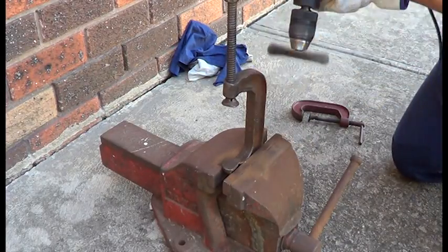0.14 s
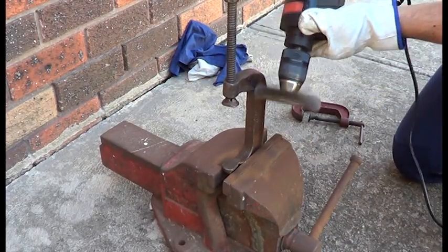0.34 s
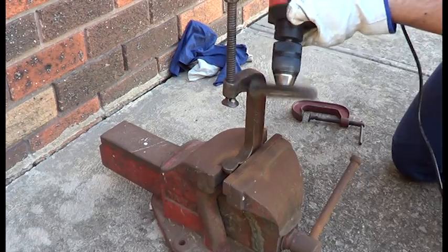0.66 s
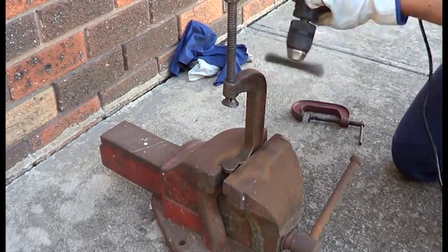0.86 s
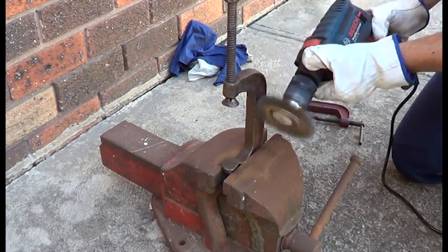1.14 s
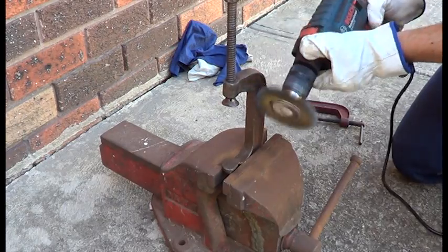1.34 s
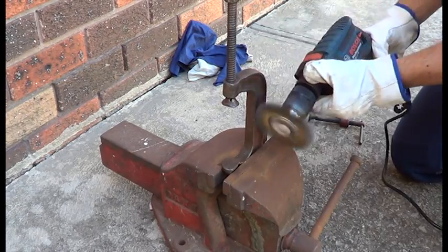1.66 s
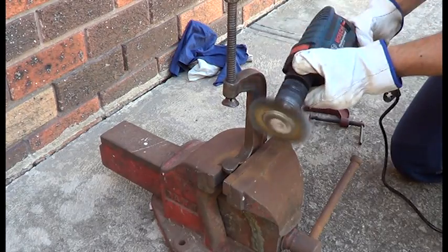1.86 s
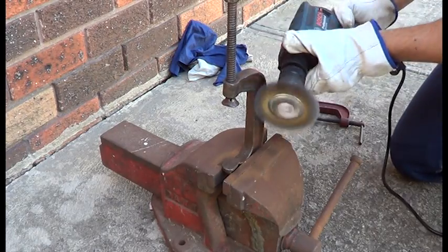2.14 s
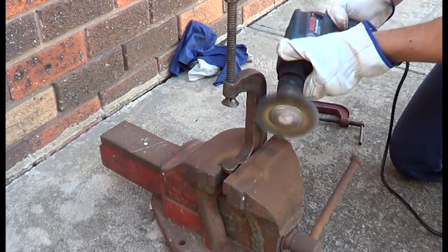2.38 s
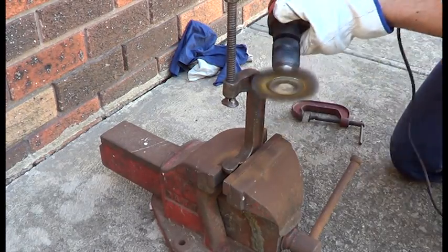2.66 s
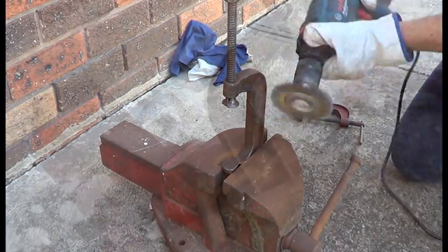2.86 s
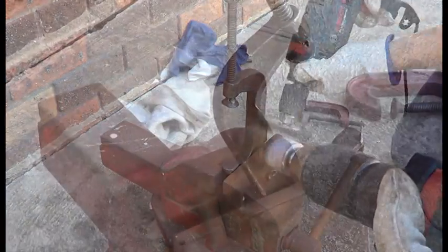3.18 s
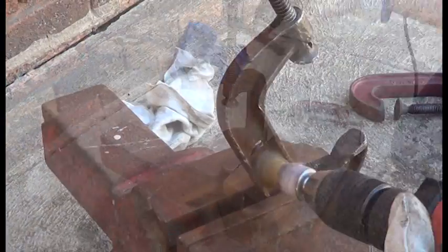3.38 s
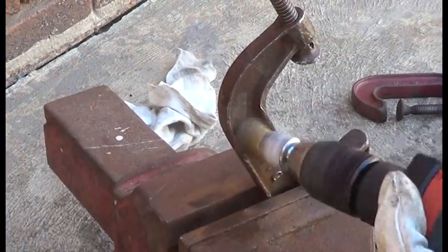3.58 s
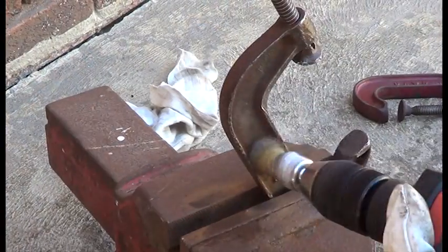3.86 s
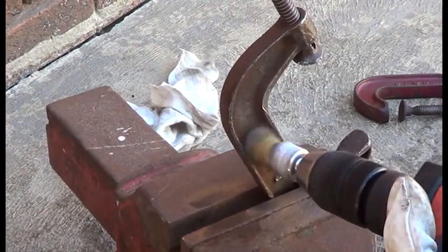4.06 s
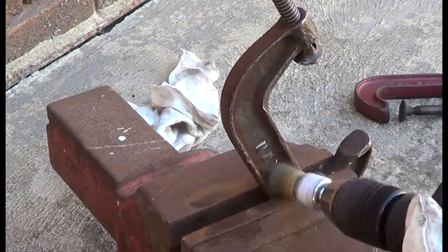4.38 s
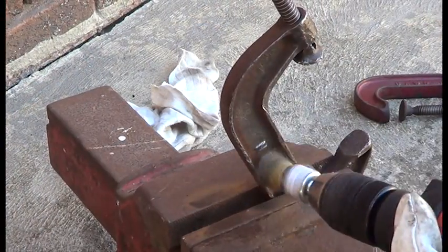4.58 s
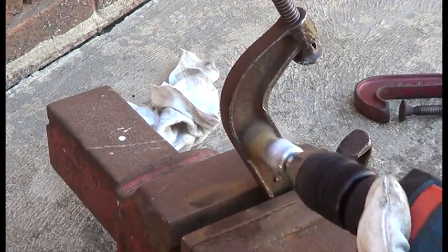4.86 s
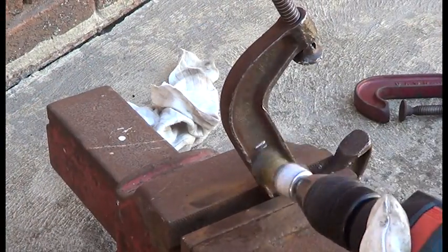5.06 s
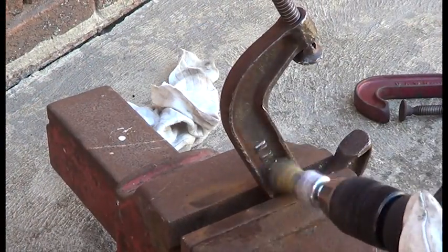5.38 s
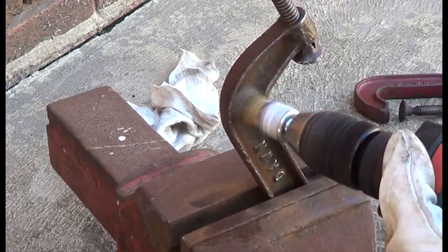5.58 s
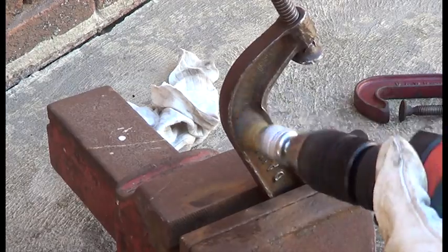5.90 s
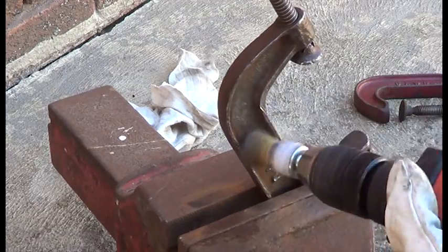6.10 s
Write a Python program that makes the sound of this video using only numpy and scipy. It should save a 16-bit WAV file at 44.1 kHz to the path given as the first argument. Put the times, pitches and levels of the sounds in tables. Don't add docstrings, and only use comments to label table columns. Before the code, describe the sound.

A drill spins free with a high whine, then bogs down as its wire brush bites rusty metal. Several uneven strokes follow, each scraping densely and sometimes ringing the clamp, with quick rises in pitch between them. Then a closer cup brush rubs continuously, its whine gliding gently and finally stuttering. Gusts thump in clusters on an exposed outdoor microphone.

```python
import sys
import numpy as np
from scipy import signal
from scipy.io import wavfile
from scipy.ndimage import uniform_filter1d

SR = 44100
rng = np.random.default_rng(int(sys.argv[2]) if len(sys.argv) > 2 else 0)


def makeup_ratio(level_db):
    decades = np.asarray(level_db, float) / 20
    return 10 ** decades


def generate_wav(signal):
    frames = np.transpose(np.atleast_2d(signal))
    scaled = np.clip(frames, -1, 1) * 32767
    pcm = np.round(scaled).astype(np.int16)
    wavfile.write(sys.argv[1], SR, pcm)


N = 275184
CHANGE_S = 3.2115
ROTOR_SHARE, SPINDLE_SHARE = .1167, 1 / 88
BITE_DB_PER_S = 258
# start in seconds, length in seconds, level in dB, added ring of the clamp in dB.
BITES = [
    (0.16, 0.018, -36, -4),
    (0.909, 0.091, -40, -13),
    (1.03, 0.335, -60, 3),
    (1.47, 0.063, -43, 5),
    (2.867, 0.064, -42, -8),
    (1.6, .6, -55, 0),
    (3.121, 0.055, -41, 4),
    (3.226, 0.054, -45, -9),
]


def in_time(rows):
    s, *columns = np.transpose(rows)
    return [np.interp(np.arange(N) / SR, s, c) for c in columns]


def at_hz(points, hz):
    point_hz, point_db = np.array(points)[:, :2].T
    return np.interp(np.log(hz), np.log(point_hz), point_db)


def rms_one(x):
    return x / np.sqrt(np.mean(x ** 2) + 1e-20)


def drift(rate):
    r = np.exp(-80 * np.pi * rate / SR)
    slow = signal.lfilter([1], [1, -2 * r, r * r], rng.standard_normal(N // 40 + 2002))
    slow = rms_one(slow[2000:])
    return np.interp(np.arange(N) / 40, np.arange(len(slow)), slow)


def bands(low_hz, high_hz, count):
    edges = np.geomspace(low_hz, high_hz, count + 1)
    return [(np.sqrt(a * b), signal.butter(2, [a, b], "band", fs=SR, output="sos"))
            for a, b in zip(edges, edges[1:])]


def resonance(x, hz, width):
    r = np.exp(-np.pi * width / SR)
    zeros = np.array([1, 0, -1]) * (1 - r * r) / 2
    return signal.lfilter(zeros, [1, -2 * r * np.cos(2 * np.pi * hz / SR), r * r], x)


def grains(spread_db, channels):
    size = np.minimum(rng.exponential(1, (channels, N)), 4)
    return rms_one(rng.standard_normal((channels, N)) * makeup_ratio(spread_db * size))


def spell(s, length, db, rise, fall):
    t = np.arange(0, N, 20) / SR
    before, after = np.maximum(s - t, 0), np.maximum(t - s - length, 0)
    return makeup_ratio(2 * (db - rise * before - fall * after)) + 1e-30


def level_of(power):
    return np.interp(np.arange(N) / 20, np.arange(len(power)), 10 * np.log10(power))


def moves():
    # time in seconds, tooth rate in hertz, 4th harmonic in dB.
    free_spin = [(0.0, 2320, -33.5), (0.055, 2290, -36), (0.112, 2324, -34), (0.125, 2290, -33),
                 (0.15, 2020, -48)]
    first_dip = [(0.285, 1334, -57), (0.3, 1255, -53), (0.316, 1162, -43.5), (0.334, 1115, -45),
                 (0.347, 1158, -49), (0.358, 1312, -48), (0.366, 1382, -52)]
    first_stroke = [
        [(0.372, 1442, -57), (0.38, 1492, -49), (0.398, 1624, -37), (0.408, 1618, -38.5), (0.494, 1765, -45),
         (0.546, 1800, -45), (0.6, 1729, -40.5)],
        [(0.61, 1744, -41.5), (0.692, 1616, -37), (0.768, 1677, -41.5), (0.808, 1682, -37.5),
         (0.846, 1655, -42), (0.872, 1667, -38.5), (0.89, 1600, -40), (.91, 1670, -54)],
    ]
    second_stroke = [(1.066, 1510, -47), (1.086, 1700, -43), (1.1, 1797, -55), (1.116, 1850, -42),
                     (1.166, 1897, -42), (1.26, 1850, -46.5), (1.359, 1668, -45.5), (1.422, 1630, -44.5),
                     (1.459, 1493, -59)]
    first_lift = [(1.621, 1603, -46), (1.645, 2110, -36), (1.664, 2230, -37.5), (1.682, 2320, -35.5),
                  (1.697, 2176, -34), (1.725, 1970, -42.5), (1.76, 1624, -41), (1.776, 1587, -47),
                  (1.796, 1472, -59)]
    bogged = [(1.804, 1390, -48), (1.822, 1360, -44), (1.842, 1385, -54), (1.858, 1362, -46),
              (1.871, 1380, -54), (1.89, 1487, -66), (1.912, 1530, -55)]
    third_stroke = [(1.925, 1558, -50), (1.941, 1589, -44), (1.965, 1590, -49), (2.027, 1675, -41),
                    (2.09, 1712, -40.5), (2.163, 1694, -41.5), (2.185, 1640, -60), (2.231, 1619, -47),
                    (2.254, 1626, -53), (2.275, 1742, -56)]
    fourth_stroke = [
        [(2.285, 1793, -48), (2.301, 1805, -43.5), (2.335, 1843, -42), (2.381, 1910, -39), (2.485, 1889, -39.5),
         (2.515, 1865, -42.5), (2.567, 1863, -41.5), (2.575, 1855, -44)],
        [(2.585, 1805, -43), (2.597, 1830, -39), (2.663, 1846, -42), (2.685, 1828, -40.5), (2.757, 1808, -41.5),
         (2.781, 1793, -49), (2.813, 1716, -39.5), (2.835, 1700, -45), (2.85, 1767, -45)],
    ]
    second_lift = [(3.036, 1700, -43), (3.054, 2030, -40), (3.073, 2220, -37.5), (3.087, 2270, -41),
                   (3.108, 2150, -39)]
    cup_up = [
        [(3.218, 1300, -45), (3.298, 1466, -45.5), (3.336, 1600, -47), (3.366, 1648, -40.5), (3.388, 1673, -48),
         (3.45, 1726, -40), (3.5, 1679, -45)],
        [(3.52, 1688, -45.5), (3.572, 1694, -40), (3.694, 1733, -42), (3.812, 1723, -44.5), (3.854, 1700, -40),
         (3.87, 1697, -44)],
        [(3.892, 1714, -43.5), (3.996, 1747, -41), (4.15, 1743, -46.5), (4.2, 1759, -42.5), (4.256, 1782, -44),
         (4.26, 1800, -54)],
    ]
    cup_turn = [(4.275, 1825, -42), (4.292, 1836, -47), (4.308, 1836, -47)]
    cup_down = [
        [(4.32, 1848, -48), (4.326, 1808, -42), (4.36, 1740, -38.5), (4.43, 1675, -39), (4.55, 1577, -42),
         (4.582, 1589, -45.5), (4.8, 1544, -41.5), (4.82, 1545, -43)],
        [(4.83, 1544, -41), (4.89, 1558, -45.5), (4.924, 1593, -45), (4.958, 1616, -41.5), (5.076, 1670, -44),
         (5.098, 1638, -41.5), (5.19, 1657, -43), (5.3, 1677, -39)],
        [(5.378, 1652, -40.5), (5.434, 1640, -39.5), (5.562, 1660, -42), (5.568, 1638, -38.5),
         (5.68, 1663, -37), (5.72, 1654, -39)],
    ]
    cup_down_end = [(5.736, 1673, -40), (5.798, 1726, -36), (5.882, 1746, -36), (5.96, 1743, -38.5),
                    (6.006, 1730, -36.5), (6.125, 1696, -38.5), (6.188, 1742, -37), (6.24, 1686, -37.5)]
    # 1st harmonic re the 4th in dB,
    # 2nd harmonic re the 4th in dB, shift of the weak harmonics in dB.
    others = [(-36, -33, -14), (-30, -30, -8), (-29.5, -27, -1), (-34, -21, 0.), (-44, -40, -6),
              (-40, -35, -10), (-40, -26, 0.), (-27, -26, 0.), (-42, -39, -12), (-23.5, -19, 0.),
              (-28.5, -28, 0.)]
    tables = (free_spin, first_dip, first_stroke, second_stroke, first_lift, bogged, third_stroke,
              fourth_stroke, second_lift, [*cup_up, cup_turn], [*cup_down, cup_down_end])
    fade_s, muted_db = .003, -86
    rates, levels = [], []
    for table, others_db in zip(tables, np.array(others)):
        rows = sorted(map(tuple, np.vstack(table)))
        rates += [(s, hz) for s, hz, db in rows]
        faded = [(rows[0][0] - fade_s, 0, muted_db), *rows, (rows[-1][0] + fade_s, 0, muted_db)]
        levels += [(s, db, *(db + others_db[:2]), others_db[2]) for s, hz, db in faded]
    return in_time(sorted(rates)) + in_time(sorted(levels))


def gears(tooth_hz, teeth, levels_db, near):
    # multiple of the tooth rate, level with the wheel brush in dB, with the cup brush in dB.
    weak = [(1.75, -34, -16.5), (3, -18, -6.5), (5, -24, -15), (12, 6, -20)]
    # frequency in hertz, level in dB.
    casing = [(1900, -29), (3400, -0.5), (4300, -1.5), (4700, -2.5), (5250, 0.5), (9000, 7.5), (10800, 23),
              (12000, 28), (13300, 8), (15000, 6)]
    # start in seconds, length in seconds,
    # 4th order in dB, 2nd, 3rd and 5th order in dB.
    hum = [
        (0, 0.12, -62.5, -76),
        (2.3, 0.55, -76, -108),
        (3.33, 0.38, -91, -77.5),
        (3.76, 0.99, -76, -90),
        (4.75, 0.13, -72, -74),
        (5.4, 0.71, -74, -88),
    ]
    # time in seconds, 6th harmonic in dB, 8th harmonic in dB.
    wheel_overtones = [(0, -47, -70), (.14, -48, -70), (.2, -69, -66), (.295, -49, -45), (.334, -55, -53),
                       (.41, -47, -45), (.52, -49, -55), (.684, -40, -49), (.75, -45, -51),
                       (.888, -42.5, -51), (.9, -68, -68), (1.09, -58, -56), (1.135, -44, -47),
                       (1.25, -46.5, -63), (1.31, -50, -50), (1.43, -50, -52), (1.47, -64, -66),
                       (1.62, -66, -61), (1.65, -52, -64), (1.81, -53, -50), (1.93, -49, -48),
                      (1.97, -62, -55), (2.04, -54, -61), (2.15, -51, -54), (2.19, -62, -49),
                      (2.27, -61, -51), (2.3, -55, -66), (2.79, -50, -66), (2.83, -42, -60),
                      (2.87, -72, -63), (3.07, -43, -66), (3.2, -72, -69)]
    cup_overtones = [(3.22, -48, -37), (3.35, -44, -52), (3.56, -47.5, -48), (3.7, -44.5, -55),
                     (4.16, -42.5, -53), (4.3, -50.5, -58), (4.37, -42.5, -52), (4.53, -46.5, -48),
                     (4.81, -57.5, -45), (4.87, -55, -60), (5.0, -49.5, -54), (6.04, -43.5, -48),
                     (6.24, -48, -51)]
    fourth_db, first_db, second_db, weak_db = levels_db
    sixth_db, eighth_db = in_time(sorted(wheel_overtones + cup_overtones))
    rotor = 2 * np.pi * ROTOR_SHARE * teeth

    hum_db, low_db = (level_of(sum(spell(*row[:2], row[k], rise=400, fall=400) for row in hum))
                      for k in (2, 3))
    out = makeup_ratio(hum_db + 5.2 * drift(13)) * np.sin(4 * rotor)
    out += makeup_ratio(low_db) * sum(makeup_ratio(2 * drift(24)) * np.sin(k * rotor) for k in (2, 3, 5))

    # harmonic, level in dB, depth of the rotor's swing in radians, waver of the hand in dB
    harmonics = [(4, fourth_db, 0.34, 0.75), (6, sixth_db, 0.46, 0.88), (8, eighth_db, 0.51, 0.5),
                 (1, first_db, 0.12, .7), (2, second_db, 0.11, 1.7)]
    mean_db = (fourth_db + sixth_db) / 2 + weak_db
    for k, wheel_db, cup_db in weak:
        level_db = mean_db + np.where(near, cup_db, wheel_db) + at_hz(casing, k * tooth_hz)
        harmonics.append((k, level_db, 0.11 * k, 0.091 * k))
    skip_db = skips(column=1)
    for k, level_db, depth, waver_db in harmonics:
        start = rng.uniform(0, 2 * np.pi, 3)
        swing = depth * (np.sin(rotor + start[0]) + 0.19 * np.sin(2 * rotor + start[1]))
        tone = np.sin(k * teeth * 2 * np.pi + swing + start[2]) * (k * tooth_hz < .45 * SR)
        shake_db = waver_db * drift(2.9) + 1.16 * drift(37)
        out += makeup_ratio(level_db + 3.0 - skip_db + shake_db) * tone
    return out


def pressure(near):
    # time in seconds, scratch level in dB.
    wheel_pressure = [(0, -34), (0.244, -39), (0.357, -36.5), (0.606, -40), (0.861, -39), (1.0, -40),
                      (1.317, -42), (1.43, -41), (1.554, -43.5), (1.639, -40), (1.751, -42.5), (1.806, -43),
                      (2.073, -39), (2.23, -42), (2.352, -41), (2.74, -41.5), (2.958, -39.5), (3.2, -40)]
    cup_pressure = [(3.214, -40.5), (3.49, -40.5), (3.687, -39.5), (3.811, -39.5), (4.27, -39),
                    (4.355, -41), (4.707, -40.5), (4.939, -39.5), (5.049, -42), (5.241, -39.5), (5.5, -42),
                    (5.56, -40), (5.727, -40), (5.904, -41), (5.999, -40), (6.24, -40)]
    steady_db, = in_time(sorted(wheel_pressure + cup_pressure))
    bite_power = sum(spell(*row[:3], BITE_DB_PER_S, BITE_DB_PER_S) for row in BITES)
    level_db = level_of(makeup_ratio(2 * steady_db[::20]) + bite_power)
    mean_db = np.where(near, -39, -45.5)
    dull, top = np.where(near, 0.81, 0.49), np.where(near, 1.5, 0.48)
    dull_db = dull * (mean_db - steady_db) + 0.04 * (level_db - steady_db)
    return level_db, dull_db, top * (mean_db - level_db)


def brush(teeth, near):
    # frequency in hertz, density in dB per hertz.
    wheel_colour = [(24, -66), (40, -38), (193, -23.5), (597, -20), (744, -24), (863, -22), (1410, -22),
                    (1720, -16.5), (4250, -6.5), (4750, -5), (5450, -1.5), (7140, -1.5), (8070, -5.5),
                    (12900, -1), (14200, -7)]
    cup_colour = [(24, -69), (40, -35.5), (657, -23.5), (953, -17.5), (1450, -22), (2700, -9.5), (3720, -9),
                  (4770, -2.5), (5670, -3.5), (8430, 3), (10300, 1), (12500, -2.5), (13800, -2.5),
                  (14900, -7.5)]
    # frequency in hertz, side under mid in dB.
    wheel_side = [(1000, -14), (2500, -13.5), (4500, -10), (7000, -12.5), (9000, -12.5), (12000, -13.5),
                  (14500, -5)]
    cup_side = [(1000, -15), (2500, -14), (4500, -13), (7000, -11.5), (9000, -16.5), (12000, -11),
                (14500, -7)]
    # frequency in hertz, width in hertz,
    # level with the wheel brush in dB, level with the cup brush in dB.
    clamp = [(962.6, 39.2, -38, -36), (1140, 83, -33, -53), (2730, 307, -37, -29), (3450, 140, -37, -40),
             (4700, 98, -15.5, -33), (4940, 59, -35, -27.5), (5210, 340, -9, -19), (5250, 70, -31, -42),
             (5470, 69, -13, -49)]
    level_db, dull_db, top_db = pressure(near)
    pulse = np.sin(2 * np.pi * ROTOR_SHARE * teeth)
    wires = grains(2.7, channels=4).reshape(2, 2, N)
    together = drift(23)
    tips = drift(10.0)
    out = 0
    for k, (hz, sos) in enumerate(bands(43.5, 2684, count=12) + bands(2590, 16300, count=18)):
        mid, side = signal.sosfilt(sos, wires[k % 2])
        place = np.log2(hz / 7000)
        colour_db = np.where(near, at_hz(cup_colour, hz), at_hz(wheel_colour, hz))
        tilt_db = dull_db * np.clip(-place / 0.31, 0, 1) + top_db * np.clip((place - .3) / .5, 0, 1)
        flicker_db = .5 * together + 0.85 * drift(35)
        flicker_db += 1.17 * tips * np.clip(2.0 * place - .3, 0, 1)
        flicker_db += 0.59 * pulse * np.clip(place + 3.9, 0, 2)
        side = side * makeup_ratio(np.where(near, at_hz(cup_side, hz), at_hz(wheel_side, hz)))
        out = out + makeup_ratio(colour_db + tilt_db + flicker_db) * np.array([mid + side, mid - side])
    out = out - near * 0.46 * resonance(out, hz=12550, width=900)

    ringing = 0
    for hz, width, wheel_db, cup_db in clamp:
        mode = rms_one(resonance(rng.standard_normal(N), hz, width))
        ringing = ringing + makeup_ratio(np.where(near, cup_db, wheel_db) + 2.0 * drift(3.0)) * mode
    ring_power = sum(spell(s, length, db, BITE_DB_PER_S, BITE_DB_PER_S) for s, length, _, db in BITES)
    ringing = ringing * makeup_ratio(4.1 * dull_db + level_of(0.74 + ring_power))
    return makeup_ratio(level_db + 1.5 - skips(column=2)) * (rms_one(out) + ringing)


def gusts():
    # start in seconds, length in seconds, level in dB, brightness in dB.
    gust_rows = [(0, 0.1, -55.5, 16), (0.147, 0.21, -53, 10), (0.37, 0.045, -48, 21),
                 (0.426, 0.25, -53, 17.5), (0.71, 0.17, -57, 15), (0.898, 0.047, -44.5, 14),
                 (0.963, 0.03, -48, 20), (1.016, 0.079, -58, 3), (1.051, 0.012, -46.5, 18),
                 (1.088, 0.2, -56, 12.5), (1.32, 0.013, -52.5, 6), (1.425, 0.068, -56.5, 6),
                 (2.551, 0.34, -63, -1), (2.965, 0.014, -49, 8), (3.216, 0.029, -52.5, 4),
                 (3.27, 0.016, -53.5, 1), (3.969, 0.046, -54, 8), (4.04, 0.026, -48.5, 7),
                 (4.082, 0.025, -52, 15), (4.136, 0.036, -48, 11), (4.26, 0.0091, -52, 12),
                 (4.195, 0.021, -50, 10), (4.96, 0.026, -49, 11), (5.044, 0.11, -60.5, 0),
                 (5.223, 0.016, -54.5, 8), (5.289, 0.015, -52, 5), (5.328, 0.058, -63.5, 6),
                 (5.466, 0.046, -72, 14), (5.803, 0.029, -66, 24), (5.979, 0.017, -75, 34),
                 (6.045, 0.12, -58.5, 5), (6.221, 0.009, -52, 5)]
    calm_db = -71
    powers = np.array([spell(s, length, db, rise=607, fall=360) for s, length, db, _ in gust_rows])
    total = powers.sum(axis=0) + makeup_ratio(2 * calm_db)
    edge = (np.array(gust_rows)[:, 3] @ powers) / total
    return level_of(total), level_of(makeup_ratio(2 * edge))


def wind():
    # frequency in hertz, density in dB per hertz.
    wind_colour = [(15, -59), (25, -33), (96, -17), (306, -4), (466, -19), (525, -6.5), (1640, -22),
                   (2560, -54)]
    likeness = [(25, .3), (70, 0.67), (160, 0.98), (330, 0.31), (700, -0.12), (1500, -0.75)]
    gust_db, edge_db = gusts()
    gust_db = gust_db - 25 / (1 + makeup_ratio(1.17 * (gust_db + 66.0)))
    lumps_db = 2.5 * drift(72) + 2.0 * np.array([drift(32), drift(96)])
    lumps_db = np.minimum(lumps_db, 3)
    struck = rng.random((2, N)) < 3500 / SR
    eddies = grains(3, channels=2) * struck + 0.03 * rng.standard_normal((2, N))
    out = 0
    for k, (hz, sos) in enumerate(bands(15.3, 2680, count=11)):
        mid, side = signal.sosfilt(sos, eddies)
        alike = np.clip(at_hz(likeness, hz), -1, 1)
        port = np.sqrt(1 + alike) * mid + np.sqrt(1 - alike) * side * [[1], [-1]]
        bright_db = (.5 * (edge_db - 5.5) + 0.12 * lumps_db) * np.clip(np.log2(hz / 500), -1.3, 2)
        out = out + makeup_ratio(at_hz(wind_colour, hz) + bright_db) * port * (-1) ** k
    return makeup_ratio(gust_db + 1.0) * rms_one(out * makeup_ratio(lumps_db)) + buffets()


def catches():
    # centre in seconds, length in seconds, level in dB.
    catch_rows = [
        (0.093, 0.028, -70),
        (0.777, 0.028, -64),
        (1.989, 0.046, -65.5),
        (2.816, 0.018, -58.5),
    ]
    t, mode_hz = np.arange(N) / SR, 1150
    swell = sum(makeup_ratio(db) * np.exp(-((t - s) / length) ** 2) for s, length, db in catch_rows)
    mode = resonance(rng.standard_normal(N), mode_hz, width=92.3)
    return swell * rms_one(resonance(mode, mode_hz, width=88.7))


def buffets():
    # peak time in seconds, peak in dB, centre in hertz, left-right difference in dB.
    buffet_rows = [(0.381, -40, 1050, 6), (0.391, -34, 1020, -4), (0.404, -49, 700, 2), (0.412, -47, 900, -2.0),
                   (0.42, -50, 820, 7), (0.556, -39, 806, 3), (0.665, -37, 865, -6), (0.902, -49, 707, 6),
                   (0.909, -34.0, 666, -1), (0.915, -29.5, 1200, 0), (0.922, -36, 480, 3), (0.929, -36, 560, 6),
                   (0.937, -30, 648, -2.0), (0.942, -49, 600, 1), (0.962, -40, 600, 3), (0.969, -36, 500, -1),
                   (0.974, -36.5, 1060, -10), (0.981, -31, 730, -1), (0.99, -37, 892, 1), (1.001, -41, 750, 7),
                   (1.05, -30, 764, 3), (1.056, -26.5, 1158, -2), (1.079, -45, 860, -5),
                   (2.967, -34.5, 416.5, -5), (3.216, -35, 589, 3), (3.233, -42, 577, -6.0),
                   (3.242, -40.5, 582, -12), (3.28, -29, 489, -1), (3.29, -41, 430, 0.), (3.99, -45, 700, -4),
                   (4.026, -53, 503.6, -15), (4.04, -36.5, 629, -2), (4.1, -36, 501, -1), (4.109, -30.5, 701, 5),
                   (4.113, -32.5, 810, 1), (4.135, -35, 602, -3), (4.141, -39, 560, 0.), (4.147, -30, 599, -1),
                   (4.158, -44, 767, 0), (4.165, -34, 650, 0.0), (4.176, -36, 506.5, 0),
                   (4.205, -36.5, 728, -6.0), (4.212, -40, 600, -4.0), (4.955, -38, 697, 6),
                   (4.959, -29.5, 660, 8), (4.964, -41, 698, 2), (4.971, -42, 754, -12), (4.98, -36, 672, 3),
                   (5.976, -36, 769.5, -1), (6.227, -33.5, 626, 4),
                   (0.33, -48, 444, 5), (0.508, -41.5, 492, 1), (0.764, -42, 1053, 0), (1.169, -47, 420, 1.0),
             (3.96, -47, 569, -3), (4.259, -44, 326.5, -3), (5.39, -48.5, 420, -1.5),
             (5.455, -44.5, 704, -1), (5.492, -42, 700, 2), (6.072, -47, 497, 2)]
    rows = buffet_rows
    rise_s, fall_s, core_s = 0.0014, 0.0032, 0.00011
    port_lag_s = .00015
    out, t = np.zeros((2, N + 1024)), np.arange(-256, 768) / SR
    shape = np.exp(np.minimum(t / rise_s, -t / fall_s))
    for (s, peak_db, hz, pan_db), noise in zip(rows, rng.standard_normal((len(rows), 2, 1024))):
        core = np.exp(-((t - port_lag_s * noise[:, :1]) / core_s) ** 2)
        puff = 0.76 * shape * noise + 1.5 * core
        puff = resonance(resonance(puff, 0.82 * hz, 0.9 * hz), 0.75 * hz, 1.4 * hz)
        puff = signal.sosfilt(signal.butter(1, 1.3 * hz, fs=SR, output="sos"), puff)
        size = np.abs(puff.mean(axis=0))
        at = max(round(s * SR) - size.argmax(), 0)
        gain = makeup_ratio(peak_db - 4.0 + pan_db / 2 * np.array([[1], [-1]]))
        out[:, at:at + 1024] += gain * puff / size.max()
    return out[:, :N]


def skips(column):
    # centre in seconds, whine loss in dB, scratch loss in dB.
    skip_rows = [
        (5.746, 11, -0.5),
        (5.807, 9, -2.5),
        (5.856, 19, -2.5),
        (5.908, 13, -2),
        (5.96, 15, -0.5),
    ]
    t, length_s = np.arange(N) / SR, 0.011
    return sum(row[column] * np.exp(-((t - row[0]) / length_s) ** 2) for row in skip_rows)


def scene():
    tooth_hz, *levels_db = moves()
    near = np.arange(N) / SR > CHANGE_S
    runout = np.sin(2 * np.pi * SPINDLE_SHARE * np.cumsum(tooth_hz) / SR) * np.where(near, .0012, .003)
    tooth_hz = uniform_filter1d(tooth_hz, size=500) * (1 + runout + 0.001778 * drift(20.7))
    teeth = np.cumsum(tooth_hz) / SR
    whine = gears(tooth_hz, teeth, levels_db, near)
    echo = makeup_ratio(np.where(near, -24, -16)) * np.roll(whine, round(.0031 * SR))
    drill = np.array([whine + echo, whine - echo]) + brush(teeth, near) + catches()
    pan_db = np.where(near, -1.1, 0) / 2
    return drill * makeup_ratio(np.array([pan_db, -pan_db])) + wind()


def top_cut(x):
    return signal.sosfilt(signal.butter(12, 15230, fs=SR, output="sos"), x)


def record(dry):
    return top_cut(dry)


dry = scene()
out = record(dry)
generate_wav(out)
```